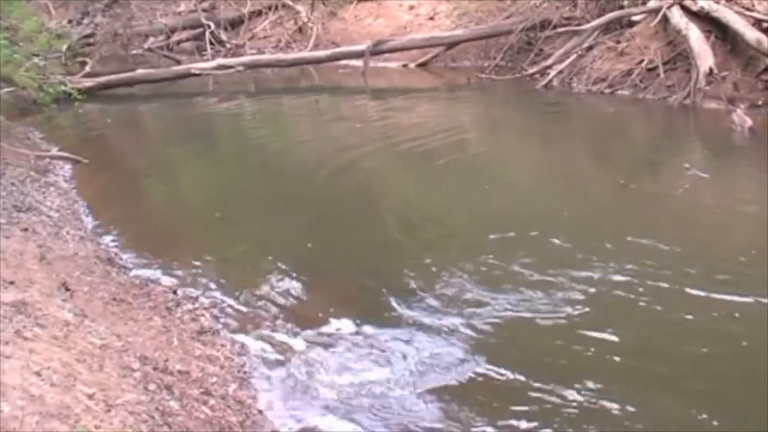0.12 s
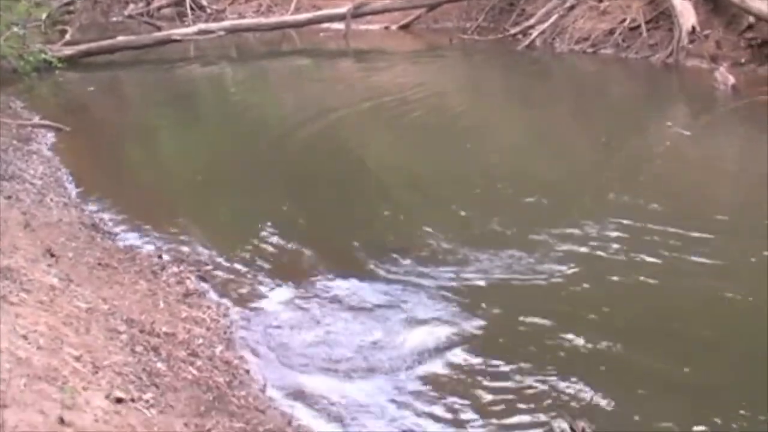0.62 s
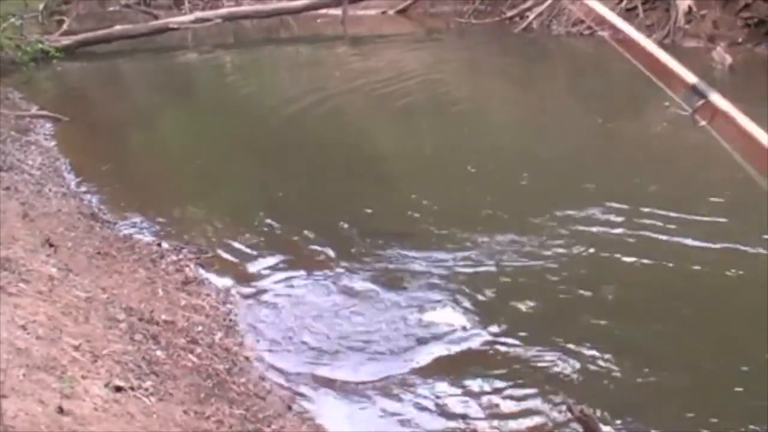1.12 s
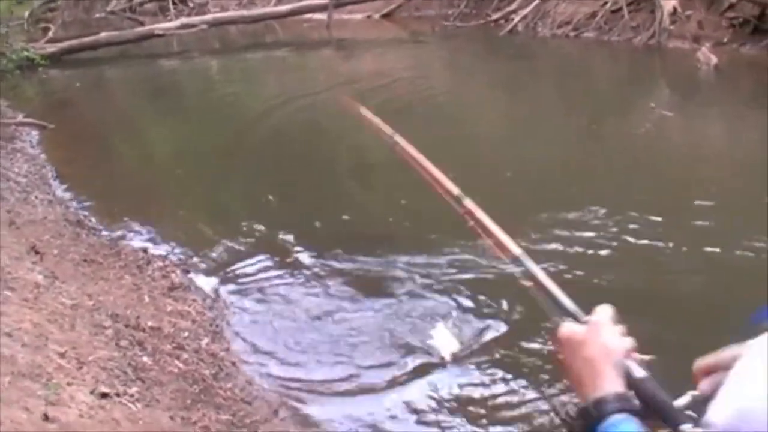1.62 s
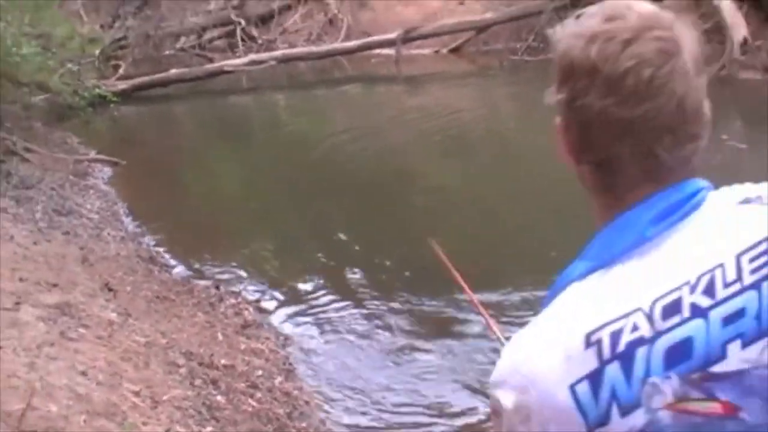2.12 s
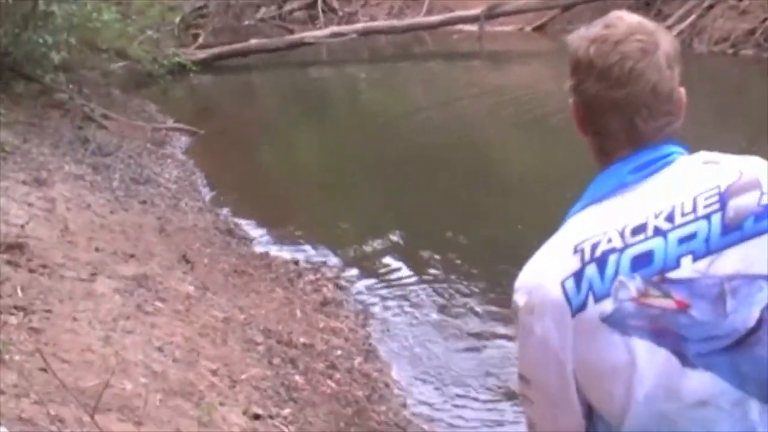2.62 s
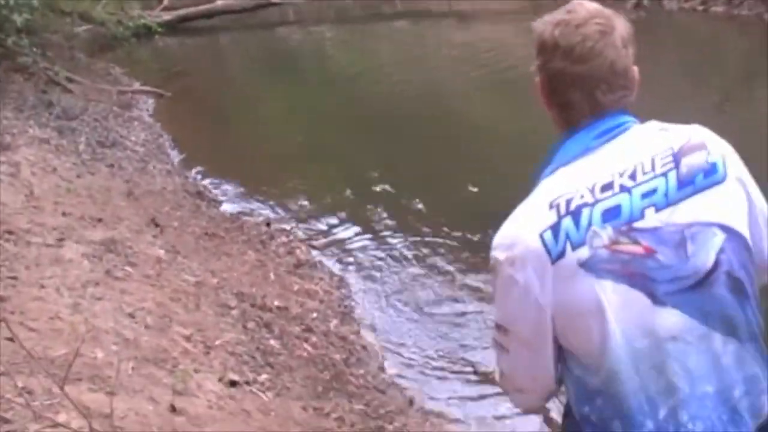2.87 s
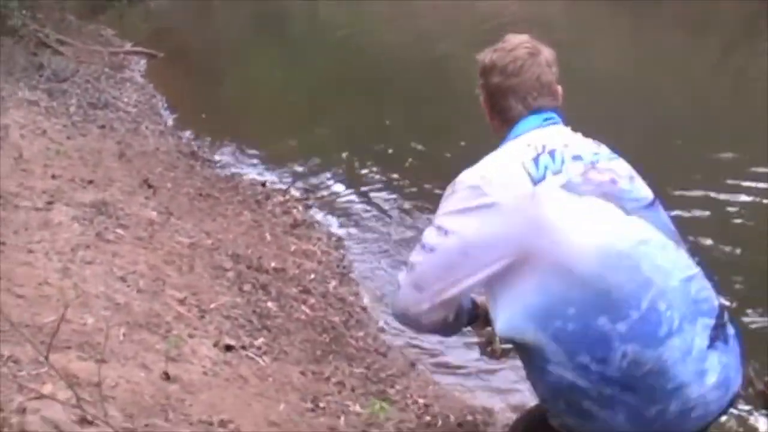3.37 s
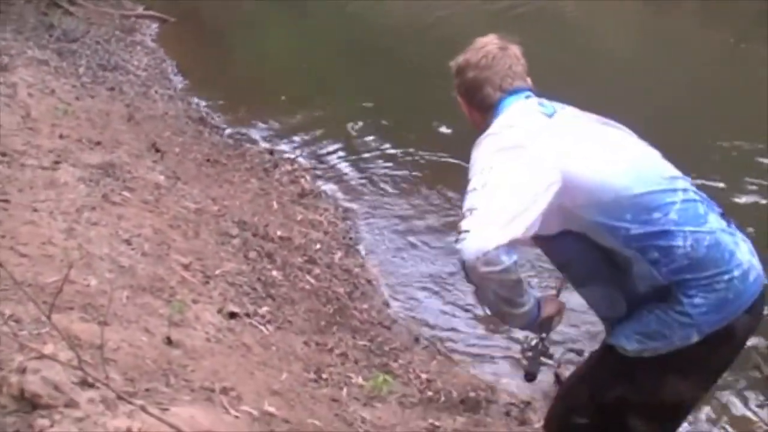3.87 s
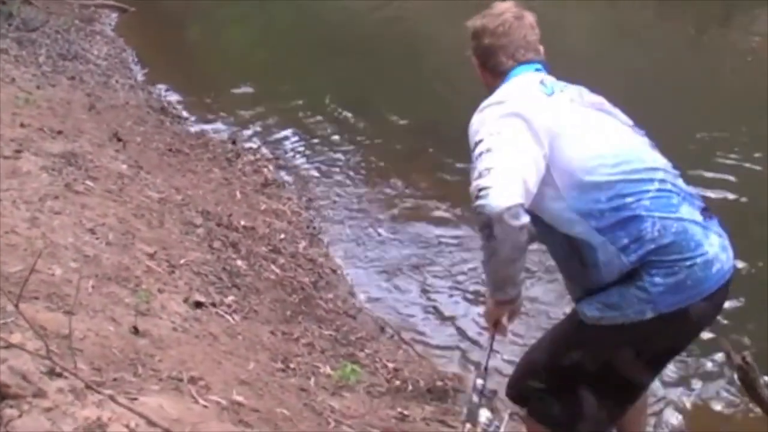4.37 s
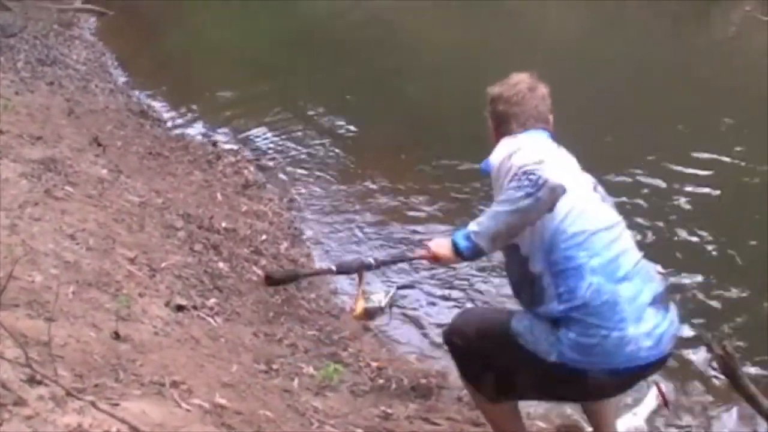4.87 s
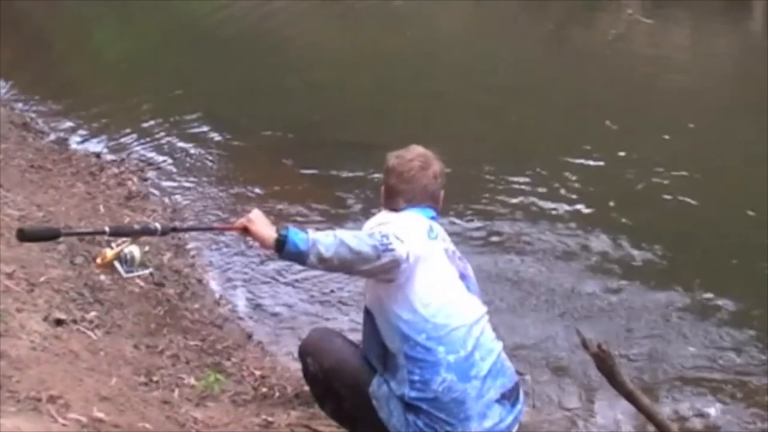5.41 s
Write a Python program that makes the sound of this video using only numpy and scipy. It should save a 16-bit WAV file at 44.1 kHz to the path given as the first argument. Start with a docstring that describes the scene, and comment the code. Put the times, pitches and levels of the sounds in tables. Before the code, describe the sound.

Fizzing splashes at a creek bank, one hard click near the microphone, footsteps cracking twigs, then a gulping splash and rattling lure hooks.

```python
"""Splashing, hissing water and a gulp of bubbles come first: a hooked fish thrashes in a creek's shallows.
An angler steps along the gravel bank and lifts it out; twigs and pebbles crack, the lure's hooks rattle.
Crowds of tiny ringing bubbles and noise make the water; rising tones make the larger bubbles.
Short noise bursts make the slaps and cracks; fading tones make the hooks and the ticks of the camera's shell.
A mid and a side capsule hear it, and are turned into left and right."""
import sys
import numpy as np
from scipy import signal
from scipy.fft import rfft, irfft, next_fast_len
from scipy.io import wavfile
from scipy.ndimage import uniform_filter1d, map_coordinates

SR = 44100
rng = np.random.default_rng(int(sys.argv[2]) if len(sys.argv) > 2 else 0)


def dump_mix(stems):
    """Bounce the given channels to the path in sys.argv[1] as a 16-bit WAV at rate SR."""
    frames = np.atleast_2d(stems).T  # one column per channel
    limited = np.clip(frames, -1, 1)  # hard clip at full scale
    pcm = np.round(limited * 32767).astype(np.int16)
    wavfile.write(sys.argv[1], SR, pcm)


def how_loud(loudness_db):
    """Turn decibels into a plain amplitude multiplier (0 dB gives 1, 20 dB gives 10)."""
    steps = np.asarray(loudness_db, float) / 20
    return 10 ** steps


N = 243414  # length in samples

# share of fine, thin spray as the fish comes close: (time [s], share [0-1])
FINE_SHARE = [(0, 0.07), (1.0, 0.21), (2.6, 0.73), (5.52, 1)]
# colours of the water layers and of the breeze: (frequency [Hz], level per Hz [dB])
COARSE_SPRAY_COLOUR = [(1650, -9), (3940, -11), (4430, -9.5), (5130, -3), (7330, -4), (14000, -36),
                       (15400, -80)]
FINE_SPRAY_COLOUR = [(1650, -28.5), (2800, -9.5), (4980, -13), (6480, -1.5), (7720, -3.5), (14400, -23),
                     (16000, -51.5)]
WASH_COLOUR = [(500, -9.5), (1400, -1), (2100, 0.5), (3000, -11.5), (4500, -11)]
SLOSH_COLOUR = [(25, -40), (200, -9), (380, -6), (800, -7), (1600, -14)]
BREEZE_COLOUR = [(25, -21.5), (150, -10), (500, -14.5), (1000, -21), (3200, -40)]
# large bubbles: (time [s], level [dB], pitch [Hz], pitch rise in one life [share], life [s])
LARGE_BUBBLES = [(.004, -37.5, 428.7, 0.131, 0.04201), (.186, -42, 485.1, 0.1995, 0.01785),
                 (1.154, -39.5, 583.1, 0.2739, 0.02858), (1.199, -39.5, 407.8, 0.1247, 0.0542),
                 (1.914, -44, 327.1, 0.5468, 0.03024), (2.417, -41.5, 360.9, 0.1064, 0.00766),
                 (3.305, -36, 2499, 0.0501, 0.002425), (4.179, -47, 735.4, 0.1892, 0.01321),
                 (4.313, -37, 749, 0.4765, 0.025995), (4.445, -45, 614.1, 0.0652, 0.01281),
                 (4.584, -31.5, 692.2, 0.1752, 0.008705), (4.619, -37, 421.4, 0.0502, 0.02132),
                 (4.627, -35, 733.5, 0.0445, 0.0295), (4.638, -25, 371.8, 0.1129, 0.03819),
                 (4.688, -27, 363.2, 0.042, 0.02656), (4.944, -32, 422.8, 0.0914, 0.01919),
                 (5.084, -39, 756.4, 0.1002, 0.01394), (5.3455, -44.5, 740.2, 0.0505, 0.01239),
                 (4.541, -40.5, 1311, 0.0499, 0.00775), (4.565, -42.5, 520.6, 0.147, 0.01645),
                 (4.711, -29, 1157, 0.464, 0.01084), (4.76, -36.5, 521.4, .1, 0.01317),
                 (5.407, -47, 735, 0.0483, 0.011946), (5.503, -45, 443.2, 0.0912, 0.01048)]
# twigs and pebbles underfoot, before filtering: (time [s], snap level [dB], knock level [dB])
FOOT_CRACKS = [(1.0968, -20.5, -49.5), (2.1234, -13.5, -33), (2.686, -12, -43.5), (2.695, -11, -31.5),
               (2.7306, -11.5, -40.5), (2.7532, -22.5, -35), (2.7925, -17, -36), (2.813, -17, -49),
               (2.8284, -25.5, -35.5), (2.9206, -17.5, -70), (2.9522, -11.5, -60), (3.014, -15.5, -62.5),
               (4.6062, -20, -34)]
# pebbles knocking together with no snap, before filtering: (time [s], level [dB], centre [Hz])
PEBBLE_KNOCKS = [(0.9265, -12, 1400), (3.174, -11, 2200), (4.4503, -19, 2200), (5.3251, -4, 2400)]
# clearest knocks of the lure's hooks and rings, before filtering: (time [s], peak level [dB])
HOOK_KNOCKS = [(3.7628, -29.5), (3.773, -29.5), (3.8266, -29), (3.8424, -26), (3.8886, -27), (4.482, -19.5),
               (4.551, -31), (4.6936, -16.5), (4.8666, -19.5), (4.871, -25), (4.8856, -22), (4.9005, -20),
               (4.953, -23), (4.982, -9.5), (4.986, -16.5), (4.9993, -16), (5.005, -20), (5.215, -28),
               (5.367, -38), (5.4051, -32), (5.424, -31.5), (5.448, -34), (5.472, -37.5)]
# tones of the lure's steel parts: (pitch [Hz], level [dB], time to fade by 60 dB [s])
HOOK_TONES = [(5708, -2, 0.01446), (6819, 1, 0.015466), (7600.5, 8.5, 0.007343), (8494, 1, 0.01258),
              (9993, -6, 0.00793), (12899, -6, 0.00886)]
# soft blows, from a tail slap to a footfall and a gush up the bank, before filtering:
# (time [s], level [dB], centre [Hz], width [share of centre], time to fade by 60 dB [s])
SOFT_BLOWS = [(1.08, -15, 1420, .5, 1.1), (1.77, -14, 140, .95, .25), (2.733, -22, 1950, .55, .09),
              (3.05, -28, 105, .95, .3), (3.45, -30, 120, .95, .3), (3.871, -25, 1900, .95, .045),
              (4.8145, -6, 1300, 1.1, 0.03)]
# a tap close to the microphone, before halving and filtering: (time [s], push level [dB], edge level [dB])
CLOSE_TAP = (.9575, -14.5, -16.5)
# how much the shallows churn between splashes: (time [s], spray level [dB])
CHURN_LEVEL = [(0, -49), (.65, -46), (0.92, -54), (1.09, -56), (1.16, -43), (1.85, -46), (2.6, -48.5),
               (3.22, -57), (4.03, -60.5), (4.445, -61), (4.46, -51), (4.6, -48), (5.05, -46.5),
               (5.52, -61)]
# splashes of fish and feet: (peak time [s], spray level [dB], wash level [dB], time to fade by 10 dB [s])
SPLASH_HITS = [(.04, -39.5, -46.5, 0.118), (0.147, -34, -44, 0.0463), (0.384, -34, -58.5, 0.0883),
               (0.514, -35.5, -50, 0.0381), (0.702, -37, -46, 0.0945), (0.769, -36, -45.5, 0.0763),
               (0.866, -38, -43, 0.1092), (1.032, -32.5, -68.5, 0.062), (1.58, -40.5, -50.5, 0.3642),
               (3.11, -47, -54, 0.2598), (3.42, -53, -53, 0.1897), (4.487, -42, -52, .02),
               (4.69, -35.5, -38.5, .075), (4.818, -33, -44, .025), (4.98, -41.5, -49.5, 0.2864)]
# heavy water heaving around the fish: (peak time [s], slosh level [dB], time to fade by 10 dB [s])
WATER_HEAVES = [(0.0, -44.5, 0.2288), (1.75, -52.5, 0.8034), (2.78, -53, 0.0016), (3.46, -55, 0.2829),
                (4.671, -33.5, 0.1024), (4.82, -40.5, 0.1252)]
# the lure shaken: (start [s], length [s], level [dB])
LURE_SHAKES = [(3.777, 0.135, -38.5), (4.485, 0.011681, -28), (4.846, 0.1829, -31), (5.039, .2, -38)]
# the fish starts off to one side, then swings ahead: (time [s], gain of the extra side water [dB])
ASIDE_GAIN = [(0.05, -20.5), (.75, -13.5), (1.0, -35)]
# dull ticks in the hand-held camera's housing: (time [s], level [dB])
GRIP_TICKS = [(1.76, -30), (1.893, -31.5), (2.083, -35)]

# wash and slosh levels in dB at a churn of -48 dB, and the dB each gains per dB of churn
WASH_DB, WASH_GROWS = -53, 1.2037
SLOSH_DB, SLOSH_GROWS = -60.5, 0.4433
SPLASH_RISE, HEAVE_RISE = 0.8799, 0.5467  # rise time over fade time
SLAP_RISE_CYCLES = 7  # rise time of a soft blow, in cycles of its centre pitch
JINGLE_GAP_S, JINGLE_SPREAD_DB = .0055, 4
HOUSING_HZ, HOUSING_T60_S = 721.6, 0.01978


def unit(x):
    """Scaled to rms 1."""
    return x / np.sqrt(np.mean(x ** 2) + 1e-20)


def curves(rows):
    """One value per sample for each column after the time."""
    s, *cols = np.transpose(rows)
    return [np.interp(np.arange(N) / SR, s, c) for c in cols]


def filtered(x, response):
    """x times a complex response of frequency."""
    m = next_fast_len(N + 8192)
    return irfft(rfft(x, m) * response(np.fft.rfftfreq(m, 1 / SR)), m)[..., :N]


def coloured(x, spectrum):
    """x shaped by (frequency [Hz], level [dB]) points on a log axis, rms 1."""
    f, db = np.transpose(spectrum)

    def shape(hz):
        return how_loud(np.interp(np.log(hz + 1), np.log(f), db, left=-90, right=-90))

    return unit(filtered(x, shape))


def peak(hz, centre_hz, width_hz):
    """A causal resonance, with gain 1 at its centre."""
    return 1j * hz * width_hz / (centre_hz ** 2 - hz ** 2 + 1j * hz * width_hz)


def wobble(rate):
    """A smooth random curve through that many random points a second."""
    points = rng.standard_normal(int(N * rate / SR) + 4)
    return map_coordinates(points, [np.arange(N) * rate / SR])


def add(track, s, sound):
    """Lays a sound into the track at time s."""
    part = track[round(s * SR):][:len(sound)]
    part += sound[:len(part)]


def burst(t, rise_s, t60):
    """A noisy burst of peak 1 that swells quickly and dies."""
    sound = (1 - np.exp(-(t / rise_s) ** 2)) * how_loud(-60 * t / t60) * rng.standard_normal(len(t))
    return sound / np.max(np.abs(sound))


def swell(s, fade_s, rise):
    """Level in dB that climbs straight to 0 at time s and falls away again."""
    late = np.arange(N) / SR - s
    return -10 * np.maximum(late, -late / rise) / fade_s


def louder(*levels_db):
    """Level of unrelated noises heard together: their powers add."""
    return 10 * np.log10(sum(how_loud(db) ** 2 for db in levels_db))


def breeze():
    """Breeze at the microphone ports: low, steady noise, separate in mid and side."""
    return coloured(rng.standard_normal((2, N)), BREEZE_COLOUR) * how_loud([[-67], [-58]])


def banks(x):
    """The creek banks scatter back a short dull tail, different for the two capsules."""
    t = np.arange(SR // 5) / SR
    tail = rng.standard_normal((2, len(t))) * how_loud(-60 * t / 0.05284)
    return signal.fftconvolve(x[None], tail / np.linalg.norm(tail[0]), axes=1)[:, :N]


def housing():
    """The plastic shell rings a few cycles each time the grip shifts."""
    out, t = np.zeros(N), np.arange(SR // 25) / SR
    for s, db in GRIP_TICKS:
        hz = HOUSING_HZ * (1 + 0.2538 * rng.standard_normal())
        fade = how_loud(db + 5.5 - 60 * t / HOUSING_T60_S)
        onset = 1 - np.exp(-t / 0.000396)
        add(out, s, fade * onset * np.sin(2 * np.pi * hz * t))
    return out


def click():
    """A sharp edge and a hard knock, then a push of air that swings back once."""
    out, t = np.zeros(N), np.arange(SR // 50) / SR
    s, push_db, edge_db = CLOSE_TAP
    edge_tones = np.cos(2 * np.pi * 6100 * t) + 2 * np.cos(2 * np.pi * 3900 * t)
    edge = how_loud(edge_db - 60 * t / .006) * .5 * edge_tones
    onset = 1 - np.exp(-t / .0001)
    push = how_loud(push_db - 60 * t / .007) * np.cos(2 * np.pi * 330 * t + 1.1) * onset
    body = how_loud(push_db - 60 * t / .005) * np.cos(2 * np.pi * 1500 * t)
    for late_s in (0, .00016):  # the contact lands twice
        add(out, s + late_s, (edge + body + push) / 2)
    return filtered(out, lambda hz: 1j * hz / (170 + 1j * hz))  # the microphone cuts the bass


def cracks():
    """A bright snap and a duller knock: a clean break, then a few milliseconds of crunch."""
    snaps, knocks, t = np.zeros(N), np.zeros(N), np.arange(SR // 50) / SR
    clean_break = t == 0  # a single sample
    for s, db, knock_db in FOOT_CRACKS:
        add(snaps, s, how_loud(db) * (2 * clean_break + burst(t, rise_s=.0003, t60=.0035)))
        crunch = .4 * burst(t, rise_s=0.0004, t60=0.006)
        add(knocks, s, how_loud(knock_db + 17.5) * (2 * clean_break + crunch))
    bright = filtered(snaps, lambda hz: peak(hz, 7442.8, 3818) ** 2 - 0.9307 * peak(hz, 4358, 2709) ** 2)
    for s, db, centre_hz in PEBBLE_KNOCKS:
        blow = np.zeros(N)
        add(blow, s, how_loud(db) * (clean_break + .5 * burst(t, rise_s=0.0004, t60=0.006)))
        bright += filtered(blow, lambda hz: peak(hz, centre_hz, centre_hz) ** 2)
    return bright + filtered(knocks, lambda hz: peak(hz, 1600, 3600) ** 2)


def jingles():
    """Unevenly spaced knocks (time [s], level [dB]) for about as long as each shake lasts."""
    knocks = []
    for s, length, db in LURE_SHAKES:
        shift, size = rng.standard_normal((40, 2)).T
        late = JINGLE_GAP_S * (np.arange(len(shift)) + .3 * shift)
        count = int(length / JINGLE_GAP_S) + 1
        knocks += [(s + u, db + JINGLE_SPREAD_DB * v) for u, v in zip(late, size)][:count]
    return knocks


def lure():
    """Each knock rings the small steel parts at new strengths and slightly new pitches."""
    out, t = np.zeros(N), np.arange(SR // 25) / SR
    hz, level_db, t60 = np.transpose(HOOK_TONES)[:, :, None]
    for s, db in HOOK_KNOCKS + jingles():
        luck = rng.standard_normal((2, len(HOOK_TONES), 1))
        strength = how_loud(level_db + 2.1 * luck[0] - 60 * t / t60)
        ring = strength * np.sin(2 * np.pi * hz * (1 + 0.02 * luck[1]) * t)
        onset = 1 - np.exp(-t / 0.00013)
        knock = ring.sum(axis=0) * onset + 2 * burst(t, rise_s=.0001, t60=.002)
        add(out, s, how_loud(db) * knock / np.max(np.abs(knock)))
    return filtered(out, lambda hz: 2 * peak(hz, 9500, 16000) ** 2)  # too small to push low sound


def slap():
    """Soft, broad blows: bursts of noise filtered around one pitch each."""
    out, t = np.zeros(N), np.arange(SR // 2) / SR
    for s, db, centre_hz, width, t60 in SOFT_BLOWS:
        blow = np.zeros(N)
        add(blow, s, how_loud(db) * burst(t, SLAP_RISE_CYCLES / centre_hz, t60))
        out += filtered(blow, lambda hz: peak(hz, centre_hz, width * centre_hz) ** 2)
    return out


def bubbles():
    """A trapped pocket of air rings, its pitch climbing as it nears the surface."""
    out, t = np.zeros(N), np.arange(SR // 5) / SR
    knots = t[::SR // 200]
    for s, db, hz, rise, life in LARGE_BUBBLES:
        u = t / life
        climbing = hz * (1 + rise * (np.minimum(u, 2) - .5))
        shake = np.interp(t, knots, rng.standard_normal(len(knots)))  # the pocket wobbles
        pitch = climbing * (1 + .04 * shake)
        loudness = (1 - np.exp(-u / .15)) * np.exp(-u ** 2) * how_loud(2 * shake)
        phase = 2 * np.pi * np.cumsum(pitch) / SR
        overtone = .15 * np.exp(-2 * u) * np.sin(2 * phase)
        add(out, s, how_loud(db) * loudness * (np.sin(phase) + overtone))
    return out


def drops(count, low_hz, high_hz, cycles, spread_db, hiss):
    """Small bubbles of uneven size ring a few cycles on a bed of noise; the side gets the same crowd shifted by
    half the scene."""
    when, pitch, size = rng.random((count, 3)).T
    hz = (low_hz * (high_hz / low_hz) ** pitch)[:, None]
    step = np.arange(1000000 // count)
    turns = hz * step / SR
    ring = np.sin(2 * np.pi * turns) * np.exp(-turns / cycles)
    ring *= how_loud(-spread_db * np.log(size + 0.0227))[:, None] * np.sqrt(hz)
    at = (when * N).astype(int)[:, None] + step
    crowd = unit(np.bincount(at.ravel(), ring.ravel(), N)[:N])
    return np.array([crowd, np.roll(crowd, N // 2)]) + hiss * rng.standard_normal((2, N))


def patchy(x, depth_db):
    """Random gain patches over time and pitch: no two handfuls of drops are alike."""
    z = signal.stft(x, nperseg=512)[2]
    field = uniform_filter1d(rng.standard_normal(z.shape[1:]), size=3, axis=0)  # over pitch
    field = uniform_filter1d(field, size=8, axis=1)  # over time
    return signal.istft(z * how_loud(depth_db * unit(field)), nperseg=512)[1][:, :N]


def stirring():
    """Spray, wash and slosh levels in dB: a slow churn with splashes and heaves on top."""
    churn_db = curves(CHURN_LEVEL)[0]
    more_db = churn_db + 48
    shapes = [swell(s, fade_s, SPLASH_RISE) for s, _, _, fade_s in SPLASH_HITS]
    spray_hits = [row[1] + shape for row, shape in zip(SPLASH_HITS, shapes)]
    wash_hits = [row[2] + shape for row, shape in zip(SPLASH_HITS, shapes)]
    heaves = [db + swell(s, fade_s, HEAVE_RISE) for s, db, fade_s in WATER_HEAVES]
    spray_db = louder(churn_db, *spray_hits)
    wash_db = louder(WASH_DB + WASH_GROWS * more_db, *wash_hits)
    slosh_db = louder(SLOSH_DB + SLOSH_GROWS * more_db, *heaves)
    return spray_db, wash_db, slosh_db


def water():
    """Spray, wash and slosh: ever larger bubbles, so ever lower pitches, stirred unevenly."""
    spray_db, wash_db, slosh_db = stirring()
    close = curves(FINE_SHARE)[0]
    stir = wobble(25.074)
    fizz = drops(count=9000, low_hz=3000, high_hz=15000, cycles=6, spread_db=2.8, hiss=1.2)
    fizz = patchy(fizz, depth_db=3.0)
    hollow = filtered(fizz, lambda hz: 1 + 2.2 * peak(hz, 3960, 260))  # a narrow ring in the churned water
    # the coarse spray lies more to the side; the fine spray is the same fizz backwards
    coarse = np.sqrt(1 - close) * coloured(hollow, COARSE_SPRAY_COLOUR) * how_loud([[0], [3]])
    fine = np.sqrt(close) * coloured(fizz[:, ::-1], FINE_SPRAY_COLOUR) * how_loud([[0], [-12]])
    wash = drops(count=3000, low_hz=800, high_hz=3500, cycles=6, spread_db=2.8, hiss=1.6)
    wash = coloured(patchy(wash, depth_db=1.4), WASH_COLOUR)
    slosh = drops(count=1500, low_hz=330, high_hz=1500, cycles=2, spread_db=1.5, hiss=2.5)
    slosh = coloured(slosh, SLOSH_COLOUR)
    return (how_loud(spray_db + 1.3 * stir) * (coarse + fine)
            + how_loud(wash_db + 1.026 * stir) * wash
            + how_loud(slosh_db + 1.7054 * wobble(7.4)) * slosh)


def side_capsule(hz):
    """The side capsule rings near 9 kHz and favours low sound from all around."""
    ring = how_loud(7.5) * peak(hz, 9011.9, 1719.7) ** 3
    treble = how_loud(-2.0) * peak(hz, 13706, 5140) ** 2
    low = how_loud(-15.5) * peak(hz, 250, 230)
    return ring + treble + how_loud(-40.5) + low


def scene():
    """Mid and side signals, turned into left and right."""
    wet = water()
    hits = bubbles() + cracks() + lure() + slap()
    tap = click()
    echo = how_loud(-14) * banks(hits)
    air = breeze()
    mid = wet[0] + hits + tap + echo[0] + air[0]
    side = filtered(wet[1] + how_loud(-19.5) * (hits + tap) + how_loud(4.5) * echo[1], side_capsule)
    # extra side water, 10 ms late
    late_water = np.roll(wet[1], SR // 100)
    aside = how_loud(curves(ASIDE_GAIN)[0]) * filtered(late_water, lambda hz: 1 + 1.494 * peak(hz, 7950, 1352))
    side = side + air[1] + how_loud(-20) * hits + aside + housing()
    return np.array([mid + side, mid - side])


def band_limit(x):
    """A steep low-pass at the top of the band."""
    return signal.sosfilt(signal.butter(12, 17000, fs=SR, output="sos"), x)


def record(dry):
    """Hands on the finished mix."""
    return band_limit(dry)


dry = scene()
out = record(dry)
dump_mix(out)
```